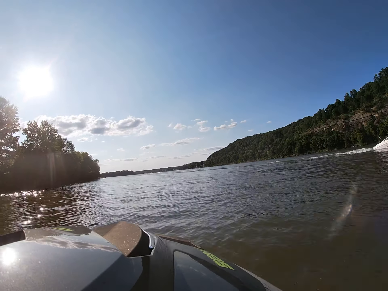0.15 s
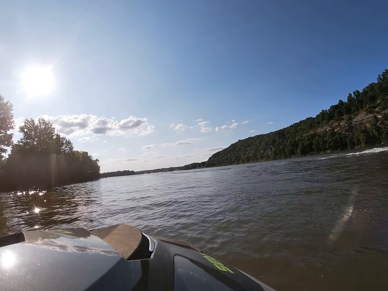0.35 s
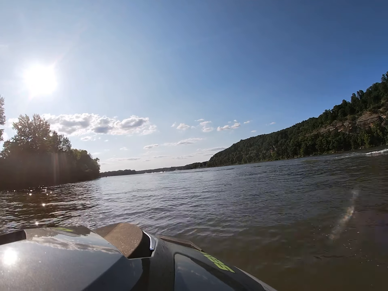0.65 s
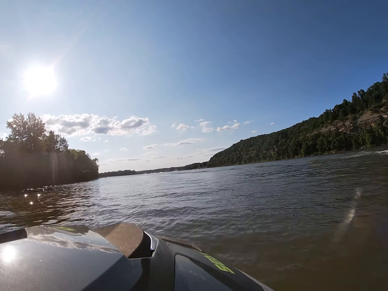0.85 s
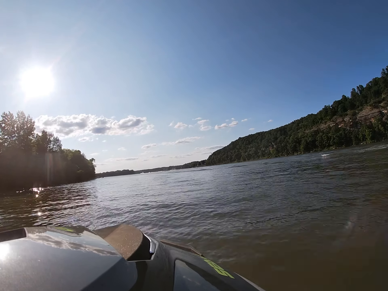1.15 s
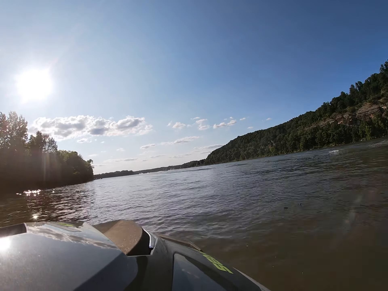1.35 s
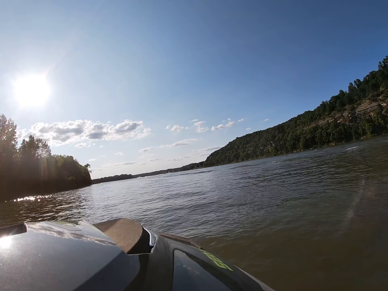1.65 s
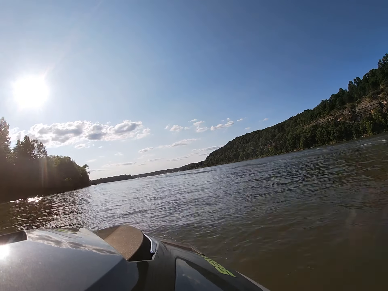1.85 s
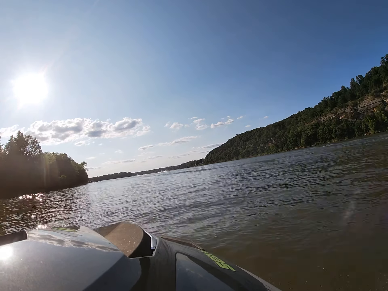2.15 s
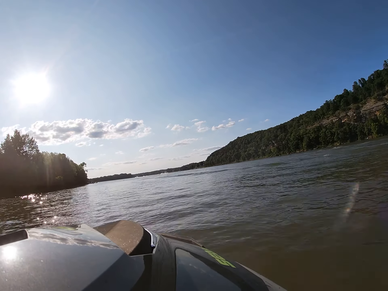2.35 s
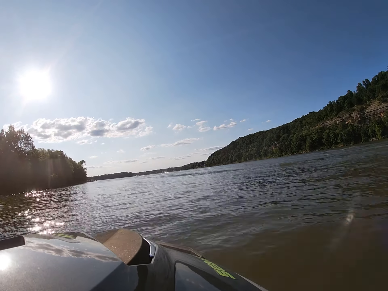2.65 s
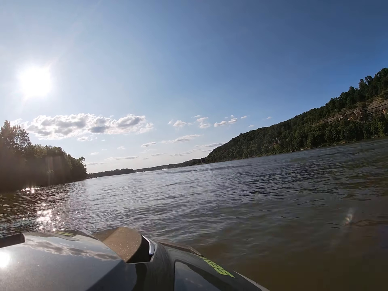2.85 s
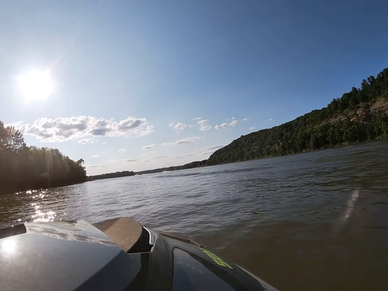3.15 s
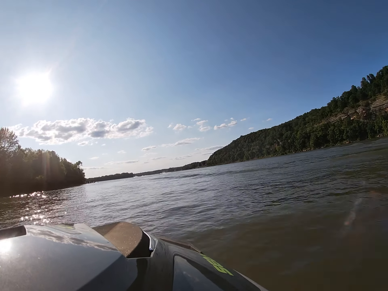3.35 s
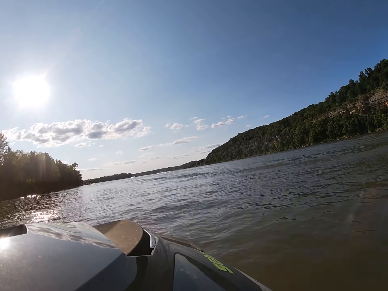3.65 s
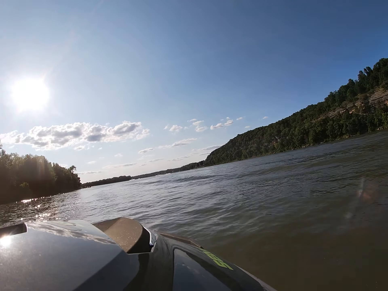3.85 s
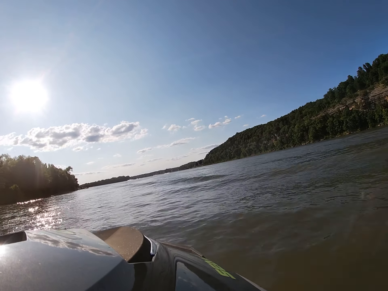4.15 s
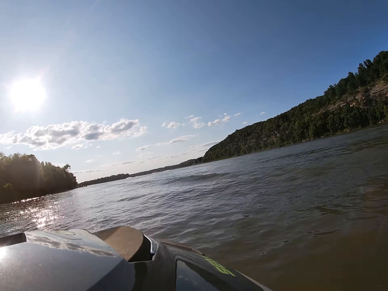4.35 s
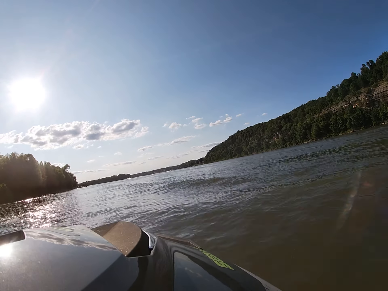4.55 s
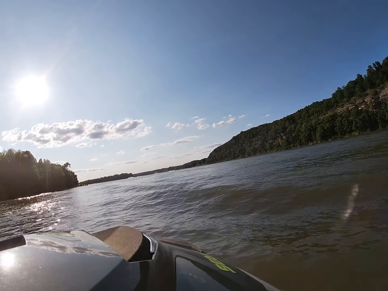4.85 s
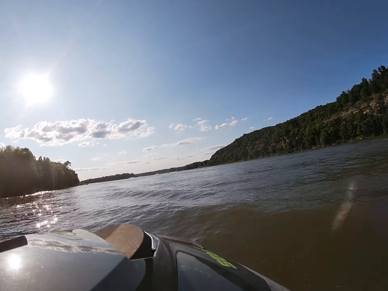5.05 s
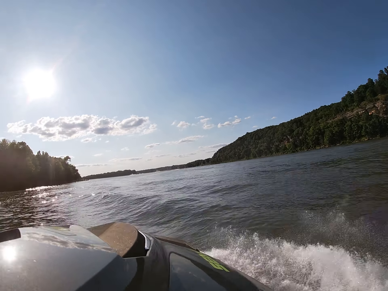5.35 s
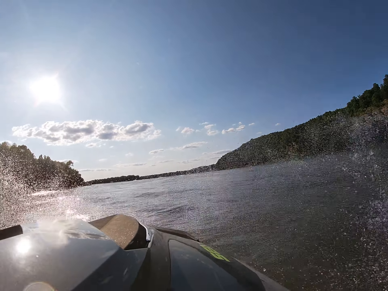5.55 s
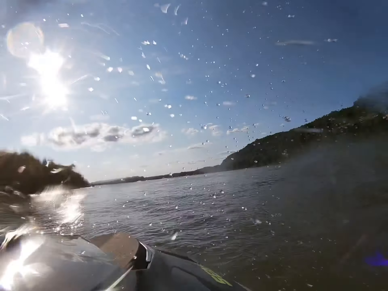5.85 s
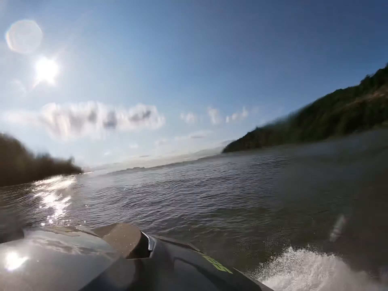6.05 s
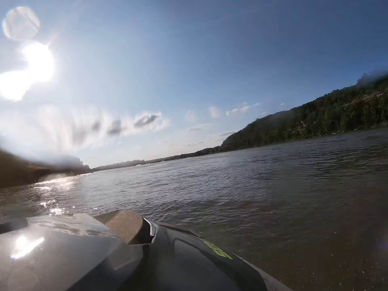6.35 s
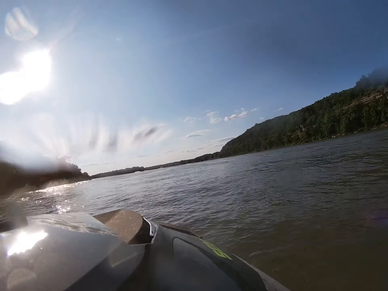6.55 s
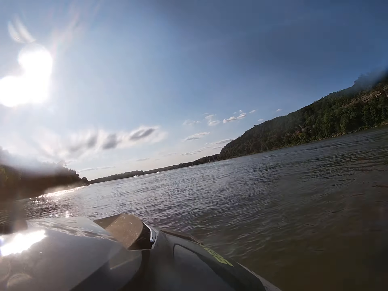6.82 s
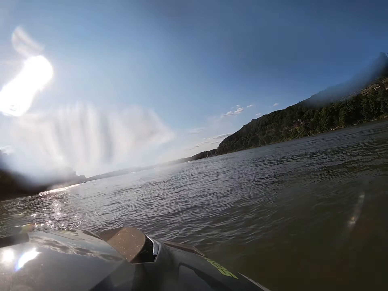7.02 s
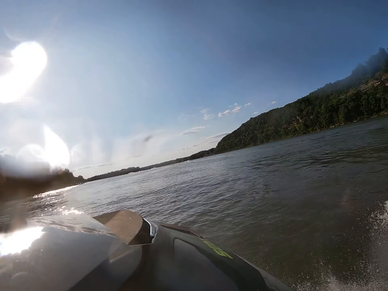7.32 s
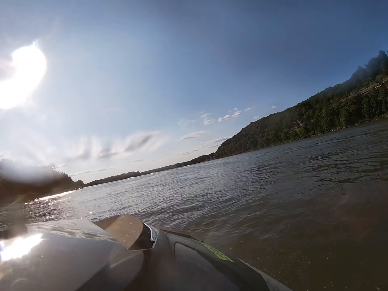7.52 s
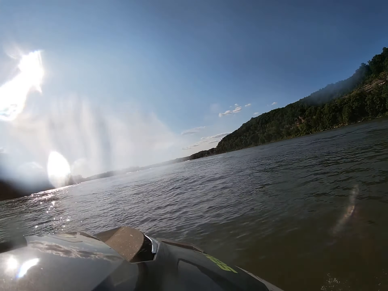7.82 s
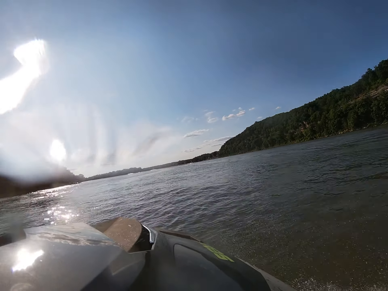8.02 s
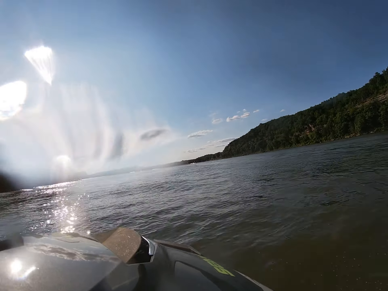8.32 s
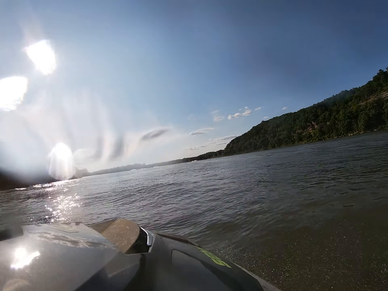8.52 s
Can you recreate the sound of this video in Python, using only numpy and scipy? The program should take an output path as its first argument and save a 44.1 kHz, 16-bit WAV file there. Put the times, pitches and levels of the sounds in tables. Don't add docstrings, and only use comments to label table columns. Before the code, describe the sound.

Muffled low engine hum, rumbling wind and gurgling water, then a revving jump, booming splash over the microphone, a second hop and pattering drops.

```python
import sys
import numpy as np
from scipy import signal
from scipy.fft import rfft, irfft, next_fast_len
from scipy.io import wavfile
from scipy.ndimage import uniform_filter1d

SR = 44100
rng = np.random.default_rng(int(sys.argv[2]) if len(sys.argv) > 2 else 0)


def generate_wav(sig):
    pcm = np.round(np.clip(np.atleast_2d(sig).T, -1, 1) * 32767).astype(np.int16)
    wavfile.write(sys.argv[1], SR, pcm)


def linear_from_db(decibels):
    return 10 ** (np.asarray(decibels, float) / 20)


N = 382788

# time in seconds, engine cycles in Hz.
THROTTLE = [(0, 37.01), (1.15, 37), (1.47, 39.74), (2.02, 39.54), (3.35, 40.32), (3.6, 39.36), (4.4, 37.77),
            (4.72, 35.76), (4.99, 35.59), (5.33, 42.58), (6.2, 35.34), (6.34, 37.47), (7.0, 31.6),
            (7.15, 33.29), (7.49, 43.47), (7.95, 40.57), (8.1, 37.33), (8.68, 38.55)]
# take-off in seconds, landing in seconds,
# speed gained in Hz, racing time in seconds, time for the jet to bite again in seconds.
LEAPS = [
    (5.345, 5.77, 19, .115, .3),
    (6.349, 6.801, 13.5, .13, .17),
]
# time in seconds, loudness in dB, brightness in dB per octave.
EXHAUST = [(.19, -11.5, 11.5), (.3, -13.5, 1.5), (.58, -9, 7.5), (1.11, -9, -8.5), (1.6, -12.5, 13),
           (2.0, -10.5, -5.5), (2.29, -14, 19.5), (2.56, -13, 2), (4.92, -10.5, 13), (5.08, -11, -26),
           (5.56, -13, 12), (6.0, -47.5, -18), (6.4, -21.5, 23.5), (6.85, -4.5, 8.5), (6.93, -15, -32),
           (7.45, -12.5, 18), (8.44, -14, 1), (8.55, -11, 16)]
# order of the cycle, level afloat in dB, change in the air in dB.
STRONG_ORDERS = [(4, -7, -3.5), (6, -12, 7), (8, -5.5, -5), (10, -15.5, -13.5)]
# order of the cycle, level relative to the strong ones in dB.
WEAK_ORDERS = [(2, -18), (5, -18), (7, -13.5), (9, -15.5), (11, -20.5), (12, -24), (14, -23), (15, -30),
               (16, -21), (18, -24)]
# time in seconds, order of the cycle, change in dB, half
# length in seconds.
ORDER_SWELLS = [(5.46, 3, -7, 0.098), (4.8, 8, 6.5, 0.065), (5.43, 10, 4, 0.063), (5.49, 4, 1.5, .04),
                (5.29, 4, -6.5, 0.095), (5.33, 3, -5, 0.049), (6.1, 5, 10, .15), (6.79, 10, 7, .04),
                (3.1, 4, -7, .15), (3.45, 8, 0, 0.16), (7.33, 8, 1.5, .06), (5.62, 10, 7, 0.044),
                (4.4, 6, -2, .12), (5.27, 6, 4.5, 0.039), (4.8, 7, 5, .15), (6.76, 9, 3.5, .08),
                (7.7, 8, 3.5, .06), (6.83, 6, -6, .025), (7.31, 3, 7.5, 0.1), (8.17, 3, -8, .1),
                (5.9, 6, 4, .15), (6.96, 6, -9, 0.034), (4.9, 6, 3, .1), (2.95, 8, 0.5, 0.13),
                (1.49, 8, 1.5, 0.092), (2.8, 11, 3, 0.79), (2.5, 14, 4, .8), (2.8, 12, 2.5, 1.1),
                (5.59, 4, -6, 0.05), (6.83, 4, -16, 0.068), (6.55, 6, -11, .07), (8.2, 3, 13, 0.19),
                (7.45, 6, -15, 0.086), (6.39, 6, 5.5, 0.037), (7.8, 6, 5.5, 0.21), (7.15, 9, 3.5, .1),
                (7.8, 10, 6, 0.16), (7.76, 8, 6.5, 0.04), (8.14, 8, 8, 0.12), (8.35, 8, -15, 0.093),
                (8.35, 6, 1.5, 0.05), (3.3, 10, 5, 1.4), (3.7, 9, 2.5, 1.5), (.15, 4, 8.5, .15),
                (7.22, 6, -8, .04), (7.36, 6, 9.5, 0.042), (5.27, 8, 5.5, 0.037), (6.68, 3, 5, .1),
                (7.38, 10, -7, .05), (6.75, 6, -1.5, .05)]
# frequency in Hz, width in Hz, level in dB.
PANEL_MODES = [(146.6, 12, -5.5), (170, 15, -1.8), (220, 34.5, 8), (226.6, 7, 4.5), (238.1, 14.2, 7.5),
               (266, 12, -5.5), (275.7, 21, -7), (295, 5.1, -12.5), (319.9, 21.9, -2), (343.7, 14, -6),
               (405.7, 37, -13), (552, 36, 10)]
# frequency in Hz, level in dB.
HULL_RESPONSE = [(60, 0), (400, 0), (510, -5), (595, 1), (635, -8), (668, 0), (715, -9), (900, -10)]
# start in seconds, peak in dB, pitch in Hz, length in seconds.
SLAMS = [(5.34, -11, 181.7, 0.01), (5.59, -22, 171, 0.038), (5.69, -13, 170, 0.035),
         (5.71, -11.5, 123, 0.022), (5.779, -16, 38, .035), (5.85, -14, 187.8, 0.019),
         (5.9, -11.5, 57.3, 0.025), (6.002, -14, 71.5, 0.021), (6.064, -12.5, 235, 0.0097),
         (6.08, -18, 44.7, 0.018), (6.98, -15, 185, 0.027), (7.063, -17, 97.7, 0.029),
         (7.153, -18, 49.7, .03), (7.2, -18, 129.7, .02), (5.299, -22, 339, 0.01),
         (5.93, -16.5, 473, 0.008), (8.071, -24, 574, 0.0091), (7.84, -22, 497, 0.011)]
# start in seconds, peak in dB, sharp edge in dB relative to it.
DROPS = [(.53, -22.5, -28), (1.083, -20, -25), (1.702, -29, -27), (2.065, -19, -26), (2.153, -20, -23),
         (2.39, -27, -25), (2.603, -25, -21), (2.198, -15, -24), (2.792, -9.5, -20), (2.928, -15, -19),
         (3.457, -14.5, -13), (3.767, -12, -15), (4.399, -16, -27), (4.447, -24, -21), (4.814, -31, -18.5)]
# start in seconds, peak in dB, sharp edge in dB relative to it.
BREAKING_WAVE = [(5.318, -22, -20), (5.335, -18, -25), (5.356, -23, -15), (5.404, -17, -20),
                 (5.444, -23, -22), (5.539, -25, -18), (5.564, -16, -16), (5.59, -16, -19),
                 (5.601, -12, -13), (5.65, -8.5, -32), (5.719, -14, -28), (5.741, -17, -21),
                 (5.761, -6, -26), (5.806, -6.5, -29), (5.847, -7, -27), (5.878, -10, -18),
                 (5.902, -7, -26), (5.952, -7, -22), (5.956, -9, -22), (6.002, -13, -21), (6.043, -16, -30),
                 (6.083, -8.5, -22), (6.165, -19, -24), (6.233, -35, -17), (6.255, -28, -26)]
# start in seconds, peak in dB, sharp edge in dB relative to it.
DRIPS = [(7.118, -27, -22), (7.16, -16, -18), (7.174, -22, -32), (7.223, -9.5, -19), (7.261, -21, -23),
         (7.316, -14, -28), (7.454, -26, -19), (7.49, -23, -23), (7.722, -19.5, -17), (7.808, -18, -19),
         (7.861, -12.5, -20), (7.903, -14, -25), (7.954, -20, -23), (8.065, -18, -46), (8.08, -11.5, -22),
         (8.125, -11.5, -30), (8.236, -9.5, -32), (8.255, -14, -28), (8.295, -20, -28), (8.337, -16, -35),
         (8.349, -21, -18.5), (8.384, -12.5, -26), (8.407, -10.5, -28), (8.555, -23, -22),
         (8.571, -25, -25)]
# time in seconds, peak in dB, length in seconds.
SHEETS = [(2.228, -30, 0.011), (2.441, -33, 0.0079), (2.708, -31.5, 0.0055), (2.781, -35, 0.0059),
          (2.821, -33, 0.0038), (2.9975, -31, 0.0046), (3.02, -34, 0.0053), (3.683, -33, .01),
          (3.716, -33, 0.0098), (3.747, -29.5, 0.017), (4.147, -35.5, 0.0097), (4.289, -26, 0.013),
          (4.356, -33, 0.006), (4.442, -28.5, 0.012), (4.471, -27, 0.013), (4.519, -31.5, 0.013),
          (4.601, -41, .012), (4.628, -41, .012), (4.658, -37, 0.0076), (5.771, -31, .01),
          (5.812, -34, .01), (5.857, -33, 0.0068), (5.975, -42, 0.0062), (7.212, -35, .012),
          (7.245, -34, .01), (5.375, -33, 0.0089), (8.158, -38, 0.0026), (8.169, -44, 0.0053),
          (8.253, -41, 0.006), (8.36, -50, 0.0053), (8.456, -35, 0.0043), (8.473, -32, 0.0066)]
# peak time in seconds, peak in dB, pitch in Hz.
PLINKS = [(7.103, -38, 3320), (7.222, -22, 1740), (7.317, -32, 3400), (8.069, -25.5, 1500),
          (8.069, -33, 2600), (8.112, -35, 1690), (8.158, -31, 2300), (8.182, -39, 2100),
          (8.238, -22, 1200), (8.254, -42, 3900), (8.258, -26, 1900), (8.295, -27, 1090),
          (8.305, -25, 1100), (8.339, -25, 1200), (8.349, -28, 2180), (8.386, -26, 2100), (8.41, -24, 1620),
          (8.448, -27.5, 2680), (8.459, -37, 2520), (8.479, -30, 3100), (8.558, -26, 2700),
          (8.567, -32.5, 2800), (8.588, -30, 2620), (8.6, -31, 2800), (8.675, -34.5, 2500),
          (5.807, -32, 1500), (5.817, -25, 1300), (5.828, -27, 1500), (5.854, -24, 1730),
          (5.879, -19, 2140), (5.894, -21, 1500), (5.905, -24, 1600), (5.925, -22, 1800),
          (5.958, -26, 3200), (6.016, -25, 2800), (6.024, -27, 3520), (6.048, -31, 2390),
          (6.084, -28, 2288), (6.091, -26, 1500), (6.167, -38, 1710), (2.933, -28, 2200), (3.875, -23, 950),
          (3.96, -29, 2100), (4.208, -23, 950), (4.883, -31.5, 2200), (5.541, -22, 950), (5.645, -28, 2199),
          (5.732, -22, 950), (5.742, -26, 2300), (5.774, -21, 950), (5.828, -15, 900), (5.862, -25, 2100),
          (6.263, -38, 1800), (7.176, -22, 895), (7.318, -28, 2002), (7.882, -33, 2000), (8.093, -23, 850),
          (8.402, -23.5, 950), (8.453, -28, 2300), (8.573, -28, 950)]
# time in seconds, peak in dB, pitch in Hz.
TICKS = [(5.664, -48.5, 8870), (5.716, -48, 9040), (5.737, -38, 9460), (5.740, -38, 4570),
         (5.762, -32, 5600), (5.789, -54, 8470), (5.811, -31, 5690), (5.828, -43, 8930), (5.835, -27, 4980),
         (5.844, -33.5, 8630), (5.852, -37, 5470), (5.856, -55.5, 9440), (5.871, -36, 5410),
         (5.898, -28, 4850), (5.916, -30, 6240), (5.917, -39, 9100), (5.926, -38, 5800), (5.959, -32, 4310),
         (5.994, -42, 4940), (6.016, -28, 4750), (6.024, -29.5, 5130), (6.0245, -43, 8520),
         (2.799, -37.5, 4490), (3.596, -38, 4500), (3.677, -40.5, 4500), (5.8455, -36, 5010),
         (5.851, -32, 4600), (5.864, -38, 4400), (5.971, -37, 4000), (8.349, -45, 4200), (8.378, -43, 4200),
         (8.389, -39, 4200), (8.41, -38.5, 4300), (8.572, -38, 4310)]
# time in seconds, peak in dB, pitch in Hz.
CHIRPS = [(0.38, -40, 3030), (0.577, -37, 3000), (0.6085, -38.5, 2890), (0.6514, -48, 3060),
          (0.9457, -43, 2840), (1.04, -37.5, 2990), (1.0859, -37.5, 2890), (1.144, -36, 2990),
          (1.474, -40, 3040), (1.495, -42, 3100), (1.9889, -39, 3160), (2.4859, -37, 2900),
          (2.5553, -40, 2695), (2.9167, -39, 3030), (3.184, -37, 3100), (3.487, -35, 3240),
          (3.9921, -48, 3080), (4.1177, -36.5, 3460), (4.5694, -40, 3500), (4.6646, -45, 3660),
          (4.6952, -35.5, 3310), (4.7394, -39.5, 3120), (4.781, -51, 3324), (4.8155, -34, 3473),
          (4.8847, -40.5, 3180), (5.6246, -31.5, 3498), (5.6371, -43, 3580)]
# time in seconds, peak in dB, pitch in Hz.
CREAKS = [(0.303, -27, 1484), (0.61, -29, 1650), (1.088, -31, 1580), (1.126, -27, 1238), (1.285, -29, 1450),
          (1.505, -28.5, 1453), (2.0142, -30.5, 1830), (3.4873, -30, 1485), (3.56, -29, 1410),
          (4.6088, -24, 1670), (4.64, -23, 1305), (4.625, -23, 1000), (4.655, -28.5, 1800),
          (4.66, -25.5, 902), (4.9117, -27, 1574)]
# time in seconds, level in dB.
WIND = [(0, -24.5), (1.33, -26.5), (2.1, -24), (2.25, -22), (3.17, -24.5), (3.99, -20.5), (5.12, -28),
        (5.46, -19), (6.04, -18), (6.14, -22.5), (6.43, -25), (6.86, -19), (7.11, -20.5), (7.3, -21.5),
        (7.74, -23), (7.83, -21.5), (8.6, -21.5), (8.68, -26.5)]
# time in seconds, level in dB.
WASH = [(0, -49.5), (.2, -45.5), (2.12, -47), (2.2, -43.5), (3.07, -43.5), (3.26, -46), (4.47, -41.5),
        (5.25, -45), (5.41, -40), (5.5, -41), (6.03, -38), (6.1, -51.5), (6.6, -45.5), (7.05, -47.5),
        (7.19, -42.5), (7.32, -44.5), (7.8, -44.5), (8.68, -43.5)]
# time in seconds, peak in dB, half length in seconds.
PLUMES = [(0.394, -67, 0.36), (1.156, -66.5, 0.35), (2.099, -66, 0.31), (3.62, -69, 0.23),
          (4.252, -71, .15), (4.9, -72.5, .2), (5.411, -61, 0.035), (5.552, -68, 0.28), (5.793, -57, 0.077),
          (7.084, -66, 0.24), (7.755, -68, 0.31)]
# frequency in Hz, density in dB per Hz.
BUFFET_SPECTRUM = [(15, -8), (30, 3.5), (70, 6.5), (110, -0.5), (200, -16.5), (400, -63.5), (800, -110)]
# frequency in Hz, density in dB per Hz.
GURGLE_SPECTRUM = [(30, -51.5), (60, -29), (110, 2), (200, 4), (300, 4), (370, -9), (450, -18.5),
                   (700, -57.5), (1400, -110)]
# frequency in Hz, density in dB per Hz.
ROAR_SPECTRUM = [(100, -65), (200, -18), (400, 3.5), (600, -1), (750, -6), (1100, -10), (1500, -13.5),
                 (2000, -28), (3000, -53.5), (6000, -110)]
# frequency in Hz, density in dB per Hz.
HISS_SPECTRUM = [(500, -59.5), (1000, -16.5), (1600, 3), (2250, 0.5), (3300, -3), (3800, -8.5),
                 (5300, -15.5), (6000, -24.5), (6700, -38.5), (9000, -93.5)]
# frequency in Hz, density in dB per Hz.
FIZZ_SPECTRUM = [(2500, -40), (4000, 4), (5400, 7), (6200, 1), (7200, -5), (8300, -4), (9800, 0),
                 (10400, -2), (11000, -10), (12000, -11), (12800, -23), (13200, -31), (14400, -40)]
# frequency in Hz, level in dB.
HOUSING = [(100, 1), (4000, -1), (5600, 0.5), (7000, -4.5), (9800, -8), (11000, -23), (13000, -44),
           (15000, -56)]


def evened(x):
    return x / np.sqrt(np.mean(x ** 2) + 1e-20)


def read(points, hz):
    f, value = np.transpose(points)
    return np.interp(np.log(hz + 1), np.log(f + 1), value)


def columns(rows):
    s, *values = np.transpose(rows)
    return [np.interp(np.arange(N) / SR, s, v) for v in values]


def drift(hz):
    steps = rng.standard_normal(N // 64 + 2)
    b, a = signal.butter(2, min(128 * hz / SR, .9))
    smooth = signal.lfilter(b, a, steps)
    return np.interp(np.arange(N) / 64, np.arange(len(steps)), evened(smooth))


def add(mix, s, sound):
    part = mix[round(s * SR):][:len(sound)]
    part += sound[:len(part)]


def engine():
    gained, lift = racing()
    speed = columns(THROTTLE)[0] + gained
    loud_db, bright_db = columns(EXHAUST)
    turn = 2 * np.pi * np.cumsum(speed * (1 + .002 * drift(hz=10))) / SR

    strong = []
    for order, db, air_db in STRONG_ORDERS:
        tilt_db = bright_db * max(np.log2(order / 6), -.3)
        strong.append((order, loud_db + db + air_db * lift + tilt_db + panels(order * speed)))
    load_db = 10 * np.log10(sum(linear_from_db(2 * db) for _, db in strong))
    load_db += 0.61 * (strong[2][1] - load_db)
    weak = [(order, load_db + db + read(HULL_RESPONSE, order * speed)) for order, db in WEAK_ORDERS]

    firing_db = np.minimum(-32.5 + 1 * (speed - 37), -21.5)
    pull_hz_s = uniform_filter1d(np.gradient(speed) * SR, size=2000)
    firing_db += 0.16 * np.clip(pull_hz_s, -80, 15)
    cylinders = 3

    out, t = np.zeros(N), np.arange(N) / SR
    for order, db in [(cylinders, firing_db)] + strong + weak:
        phase = round(order) * turn + .03 * order * drift(hz=16) + 2 * np.pi * rng.random()
        freed_db = sum(change_db * np.exp(-((t - s) / half_s) ** 2)
                       for s, k, change_db, half_s in ORDER_SWELLS if round(k) == order)
        waver_db = 1.2 * drift(hz=12) + 0.87 * drift(hz=3.5)
        out += np.sqrt(2) * linear_from_db(db + freed_db + waver_db) * np.sin(phase)
    return out, turn


def racing():
    t, gained, out = np.arange(N) / SR, np.zeros(N), np.zeros(N)
    for off, land, hz, race_s, bite_s in LEAPS:
        rise = 1 - np.exp(-np.clip(t - off, 0, land - off) / race_s)
        lift = rise * np.clip(1 - (t - land) / bite_s, 0, 1)
        gained = gained + hz * lift
        sinking = np.exp(-abs(t - land) / 0.099)
        out = out + lift * (t < land) + lift * sinking * (t >= land)
    return gained, out


def panels(hz):
    stiff = linear_from_db(2 * -28.5)
    modes = sum(linear_from_db(2 * db) / (1 + (2 * (hz - f) / width) ** 2) ** 2 for f, width, db in PANEL_MODES)
    return 10 * np.log10(stiff + modes)


def slams():
    out, t = np.zeros(N), np.arange(9000) / SR
    for s, db, hz, length_s in SLAMS:
        envelope = np.e * t / length_s * np.exp(-t / length_s)
        add(out, s, linear_from_db(db) * envelope * np.sin(2 * np.pi * hz * t))
    return out


def splashes():
    out = np.zeros(N)
    for s, db, edge_db in DROPS + BREAKING_WAVE + DRIPS:
        add(out, s, linear_from_db(db - 9.5) * burst(hz=1082, width_hz=1000, length_s=0.0014))
        add(out, s, linear_from_db(db - 5.5) * burst(hz=563, width_hz=640, length_s=0.002))
        add(out, s, linear_from_db(db + edge_db - 3.0) * burst(hz=3000, width_hz=2100, length_s=0.00078))
    for s, db, length_s in SHEETS:
        brush = burst(hz=3290, width_hz=2750, length_s=np.clip(length_s, .002, .012))
        add(out, s - .003, linear_from_db(db - 2.5) * brush)
    return out


def burst(hz, width_hz, length_s):
    t = np.arange(2500) / SR
    pole = np.exp(-1.5 * np.pi * width_hz / SR)
    raw = rng.standard_normal((2, len(t) + 300))
    wobble = signal.lfilter([1], np.poly([pole] * 4), raw)[:, 300:]
    band = wobble[0] * np.cos(2 * np.pi * hz * t) + wobble[1] * np.sin(2 * np.pi * hz * t)
    puff = band * t * (1 - np.exp(-t / .0003)) * np.exp(-t / length_s)
    return puff / abs(puff).max()


def plinks():
    out = np.zeros(N)
    for s, db, hz in PLINKS:
        ring(out, s, db + 3, hz, cycles=.5)
    return out


def ticks():
    out = np.zeros(N)
    for s, db, hz in TICKS:
        ring(out, s + .0005, db, hz, cycles=.8)
    return out


def ring(mix, s, db, hz, cycles):
    t = np.arange(600) / SR
    u = t * hz / cycles
    envelope = (np.e * u / 3) ** 3 * np.exp(-u)
    tone = np.sin(2 * np.pi * (hz * t + rng.random()))
    add(mix, s - 3 * cycles / hz, linear_from_db(db) * envelope * tone)


def strap():
    out = np.zeros(N)
    for s, db, hz in CHIRPS:
        add(out, s - .003, linear_from_db(db) * burst(hz=hz, width_hz=240, length_s=.007))
    for s, db, hz in CREAKS:
        add(out, s - .003, linear_from_db(db - 1.5) * burst(hz=hz, width_hz=420, length_s=.007))
    return out


def air_and_water(turn):
    (buffet_db,), (hiss_db,), t = columns(WIND), columns(WASH), np.arange(N) / SR
    gurgle_db = -21 + 0.086 * (buffet_db + 21) + 0.3 * (hiss_db + 44.5)
    roar_db = -30 + 0.51 * (buffet_db + 21.5) + 1.0 * (hiss_db + 46)
    plumes = sum(linear_from_db(2 * db) * np.exp(-((t - s) / half_s) ** 2) for s, db, half_s in PLUMES)
    mist_db = -75 + .5 * (hiss_db + 45.5)
    fizz_db = 10 * np.log10(plumes + linear_from_db(2 * mist_db))

    gust, flick, patter = drift(hz=9.9), drift(hz=68.5), drift(hz=170)
    lumps_db = 0.5 * np.maximum(hiss_db + 43.5, 0) * drift(hz=25)
    patter_db = 1.1 * np.maximum(hiss_db + 43, 0) * (patter - .5)
    roar_db = roar_db + 1.1 * gust + 0.95 * flick + lumps_db
    eased_db = hiss_db - 0.36 * np.maximum(hiss_db + 41.5, 0)
    eased_db += 0.4 * gust + 0.32 * flick + 1.3 * lumps_db + 0.99 * drift(hz=40)
    fizz_db = fizz_db + 7.0 + 0.4 * gust + .6 * flick + .8 * patter + patter_db

    firing_puffs = 1 + 0.24 * np.cos(3 * turn)
    buffet = noise(BUFFET_SPECTRUM, size=4096, patchy_db=-0.5) * linear_from_db(buffet_db)
    gurgle = noise(GURGLE_SPECTRUM, size=2048, patchy_db=1.0) * firing_puffs * linear_from_db(gurgle_db + 0.3 * gust)
    roar = noise(ROAR_SPECTRUM, size=1024, patchy_db=0.33) * linear_from_db(roar_db)
    hiss = noise(HISS_SPECTRUM, size=512, patchy_db=0.0) * linear_from_db(eased_db + patter_db)
    fizz = noise(FIZZ_SPECTRUM, size=512, patchy_db=-0.6) * linear_from_db(fizz_db)
    return buffet + gurgle + roar + hiss, fizz


def noise(spectrum, size, patchy_db):
    a, b, patches = rng.standard_normal((4 * N // size + 5, size // 2 + 1, 3)).T
    patches = uniform_filter1d(patches, size=8, axis=0)
    patches = evened(uniform_filter1d(patches, size=8, axis=1))
    colour_db = read(spectrum, np.fft.rfftfreq(size, 1 / SR))[:, None]
    z = (a + 1j * b) * linear_from_db(colour_db + patchy_db * patches)
    return evened(signal.istft(z, nperseg=size, noverlap=3 * size // 4)[1][:N])


def through_housing(x):
    size = next_fast_len(N)
    gain = linear_from_db(read(HOUSING, np.fft.rfftfreq(size, 1 / SR)))
    return irfft(rfft(x, size) * gain, size)[:N]


def scene():
    hum, turn = engine()
    air, fizz = air_and_water(turn)
    enclosed = hum + air + splashes() + strap() + slams() + plinks()
    return (through_housing(enclosed) + fizz + ticks())[None]


def roll_off(x):
    return signal.sosfilt(signal.butter(12, 14400, fs=SR, output="sos"), x)


def record(dry):
    fade = np.minimum(.5 + np.arange(N)[::-1] / 400, 1)
    limited = 1.2 * np.tanh(dry / 1.2) * fade
    return roll_off(limited)


dry = scene()
out = record(dry)
generate_wav(out)
```